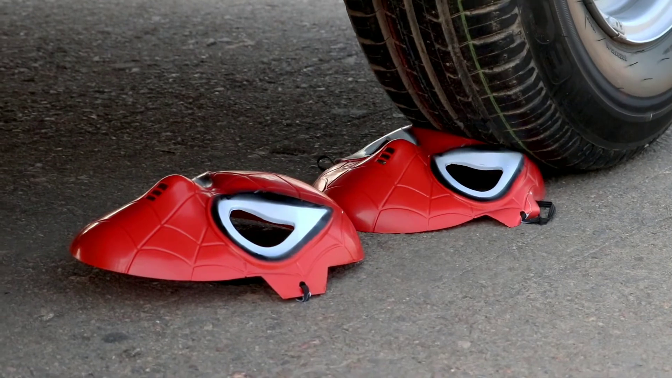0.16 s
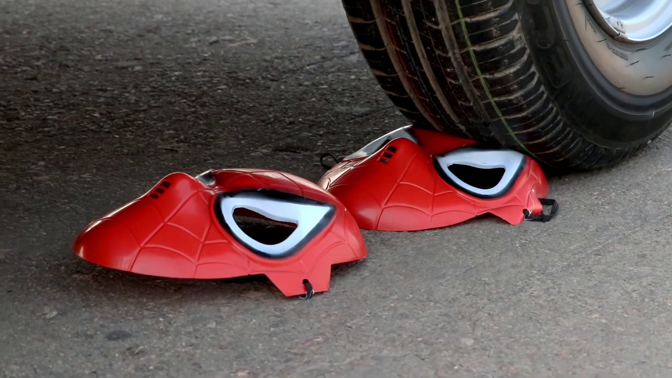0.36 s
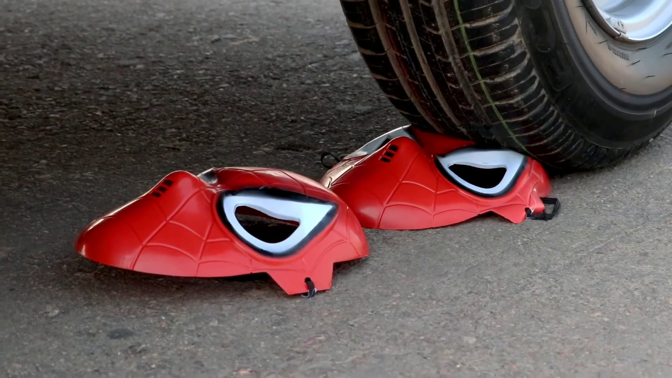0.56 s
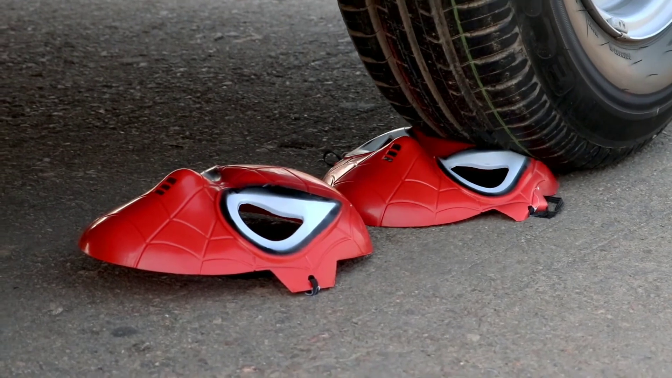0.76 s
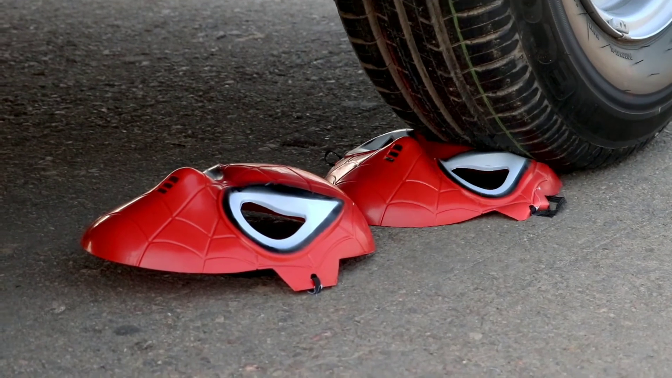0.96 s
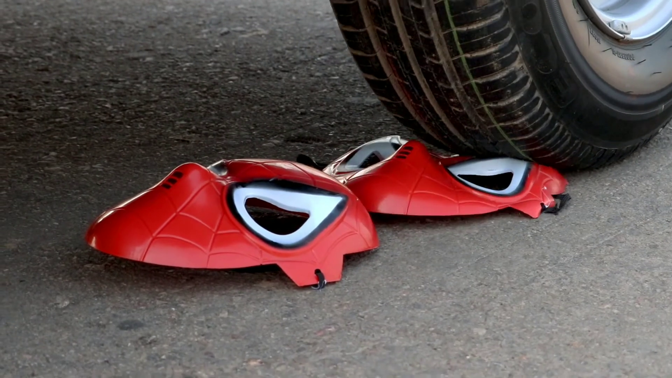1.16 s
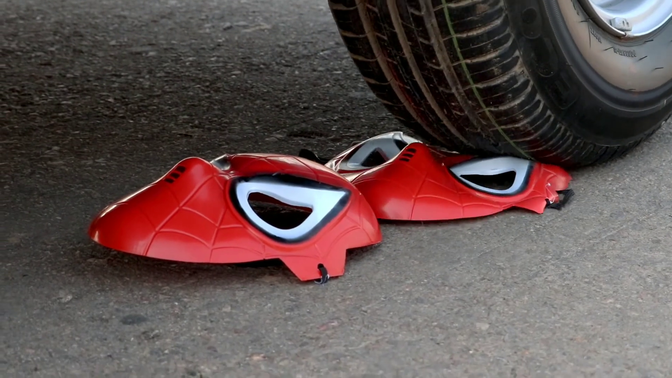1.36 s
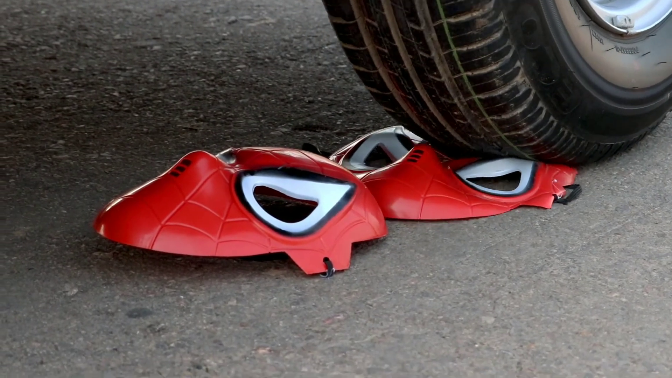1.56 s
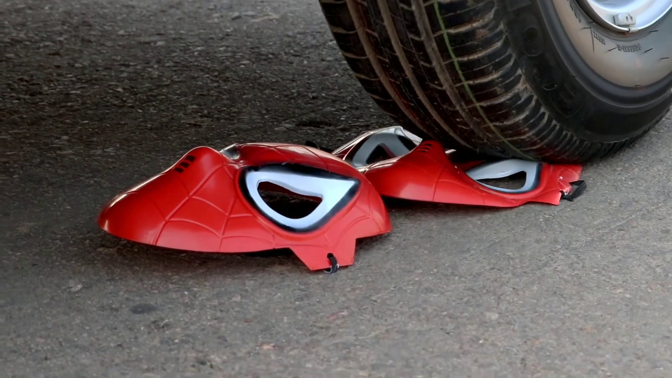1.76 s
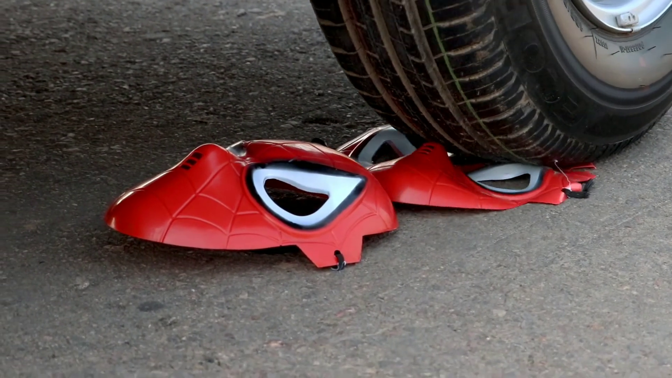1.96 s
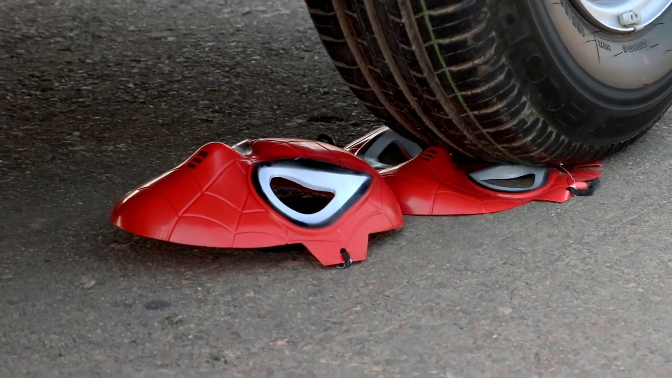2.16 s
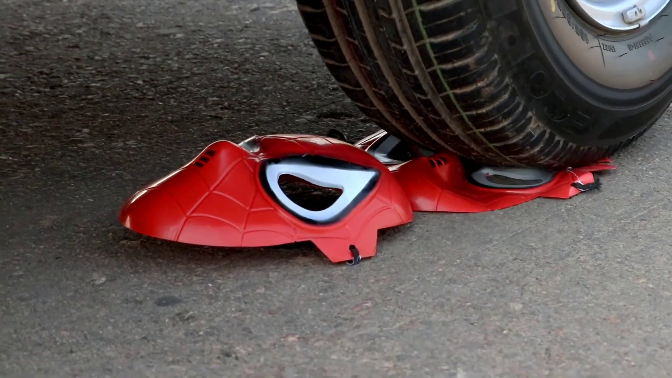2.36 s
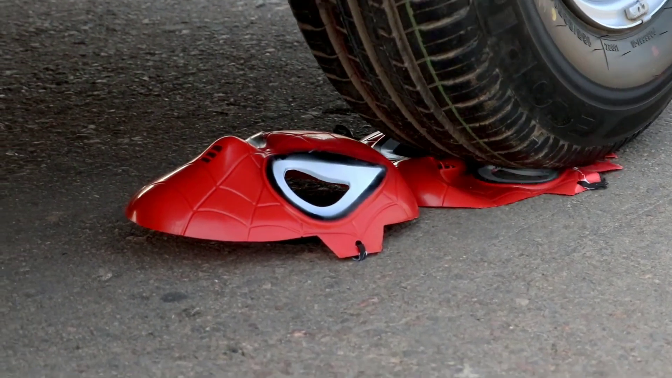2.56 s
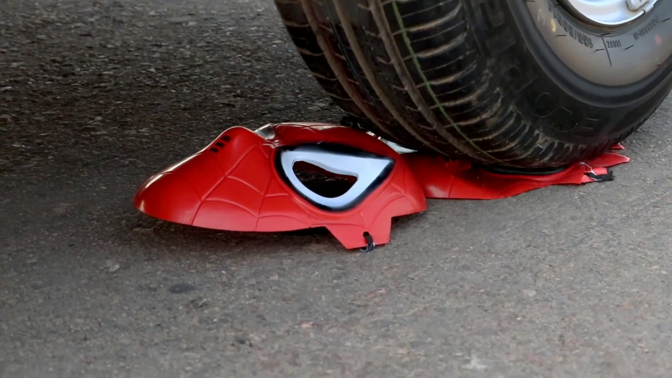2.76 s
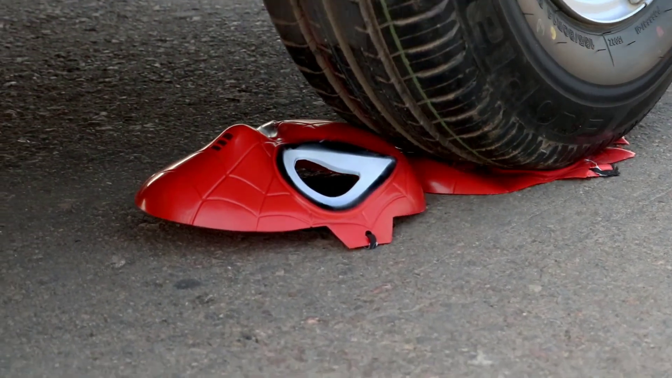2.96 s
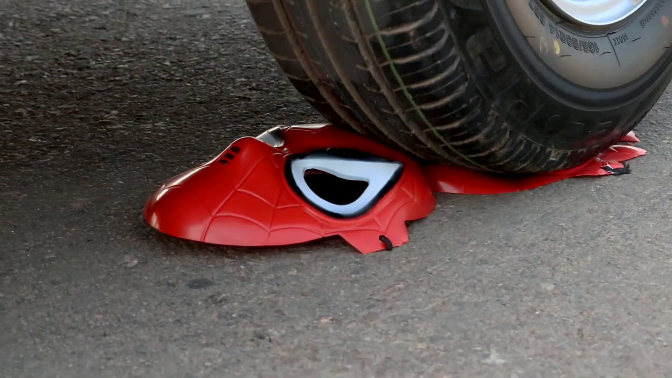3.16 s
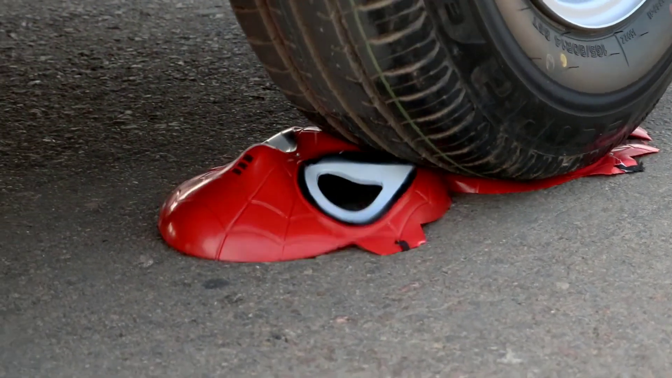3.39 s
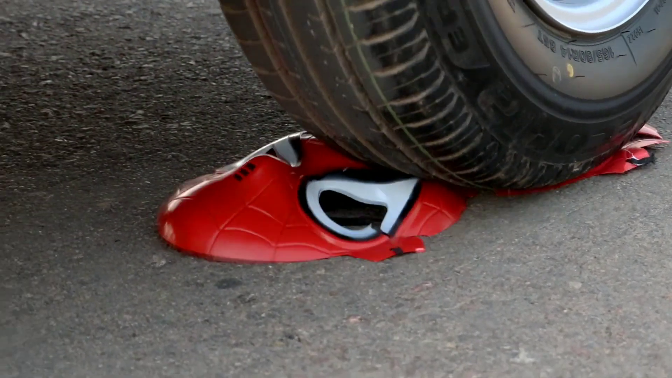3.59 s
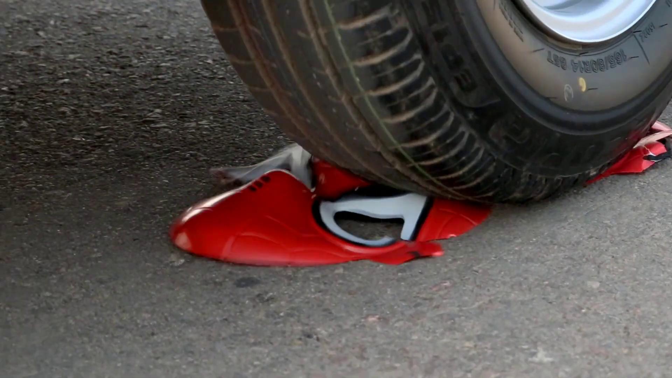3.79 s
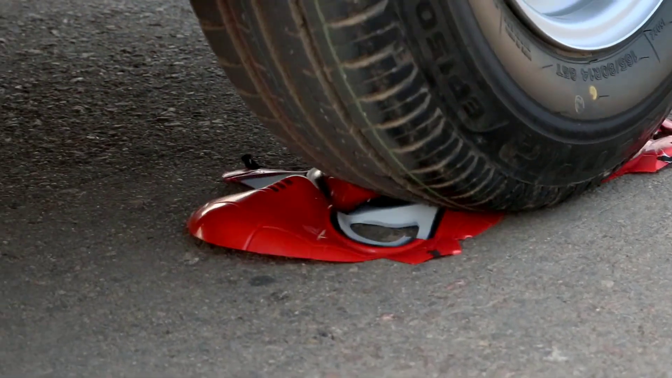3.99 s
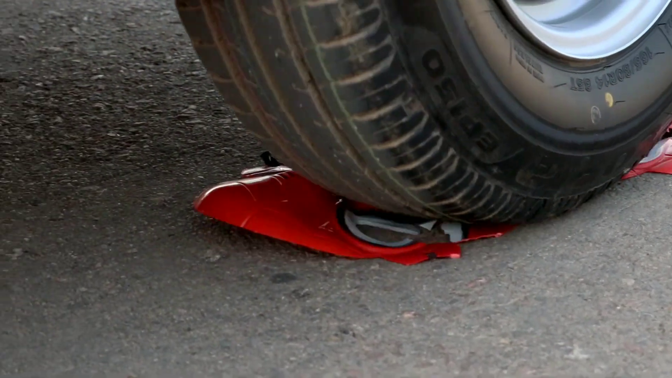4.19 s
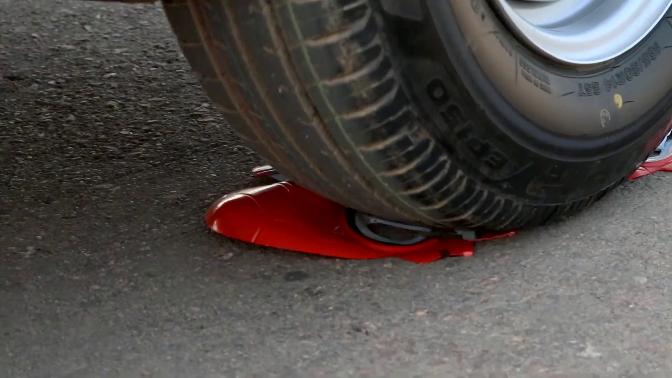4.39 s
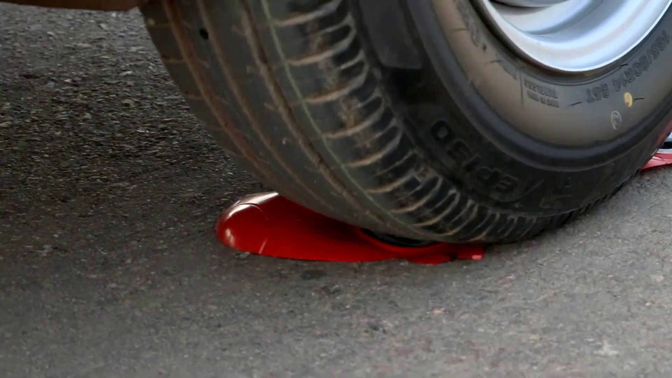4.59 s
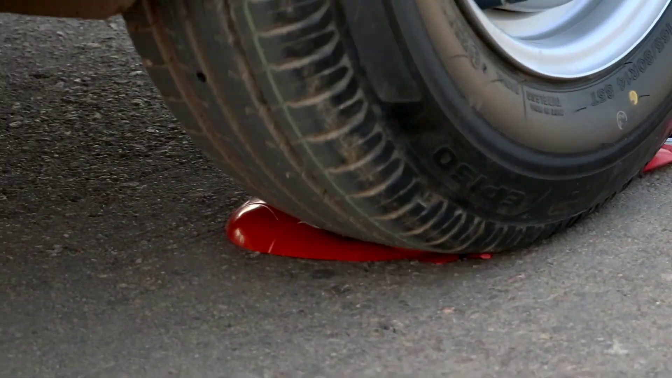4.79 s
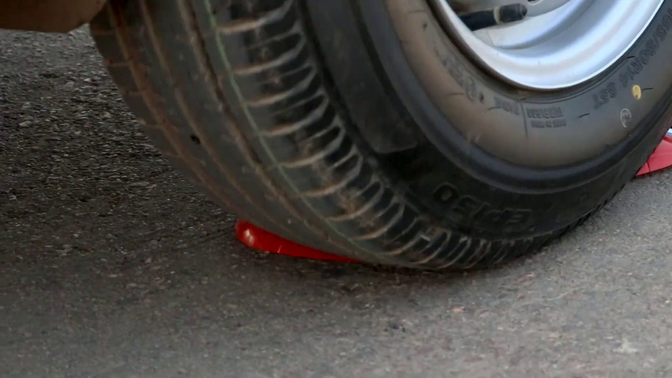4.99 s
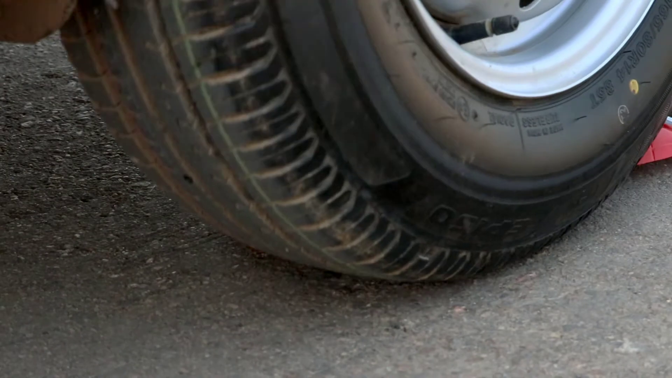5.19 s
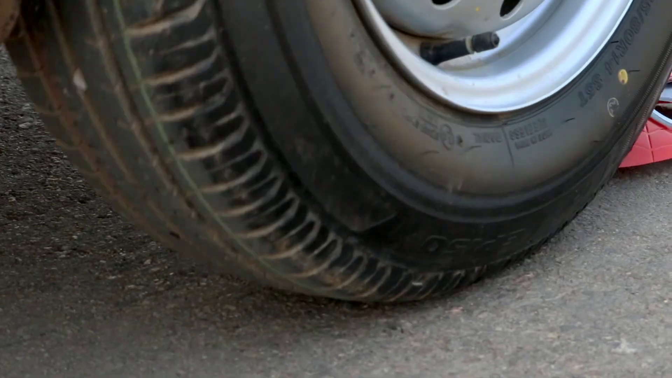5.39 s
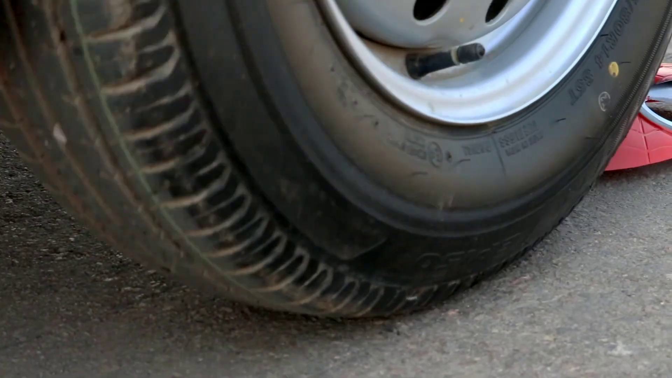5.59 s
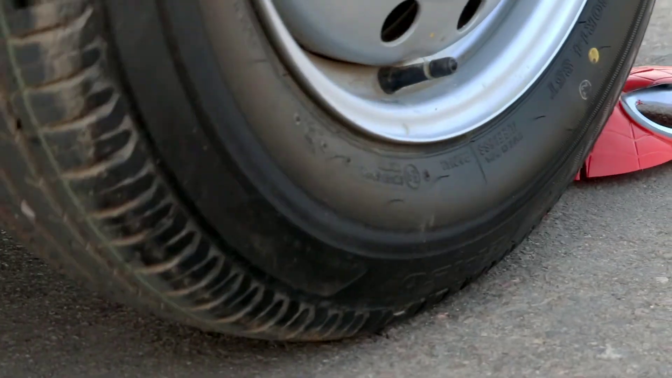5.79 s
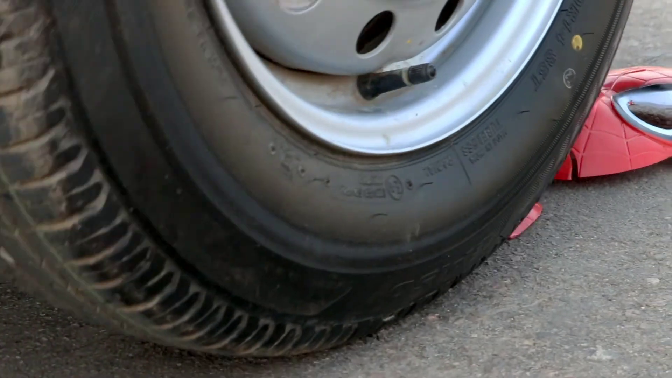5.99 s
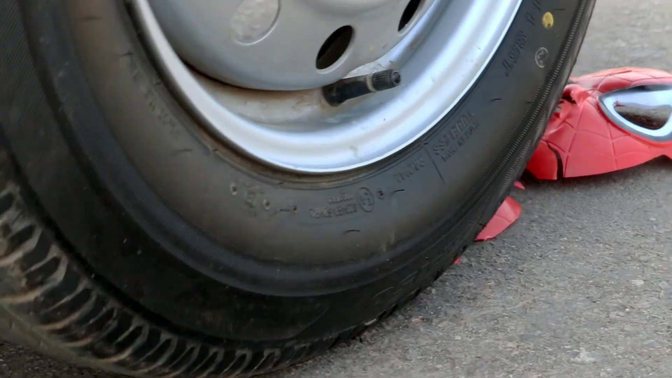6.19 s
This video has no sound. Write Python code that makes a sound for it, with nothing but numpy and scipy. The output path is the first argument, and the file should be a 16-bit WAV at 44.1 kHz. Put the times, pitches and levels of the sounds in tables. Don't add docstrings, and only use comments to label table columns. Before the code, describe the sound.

Slow-motion crushing of plastic masks on asphalt: heavy muffled cracks in uneven bursts, the loudest distorting, each trailing a short outdoor echo.

```python
import sys
import numpy as np
from scipy import signal
from scipy.fft import rfft, irfft, next_fast_len
from scipy.io import wavfile
from scipy.ndimage import uniform_filter1d

SR = 44100
rng = np.random.default_rng(int(sys.argv[2]) if len(sys.argv) > 2 else 0)


def undo_db(level):
    steps = np.asarray(level, float) / 20
    return 10 ** steps


def waveform_to_disk(signal):
    frames = np.transpose(np.atleast_2d(signal))
    scaled = np.clip(frames, -1, 1) * 32767
    samples = np.round(scaled).astype(np.int16)
    wavfile.write(sys.argv[1], SR, samples)


N = 275536
PATCH_HZ = np.linspace(70, 4700, 70)
LAG_S = 0.002


def evened(x):
    return x / np.sqrt(np.mean(x ** 2) + 1e-20)


def read(points, hz):
    f, value = np.transpose(points)
    return np.interp(np.log(hz + 1), np.log(f + 1), value)


def add(mix, s, sound):
    part = mix[round(s * SR):][:len(sound)]
    part += sound[:len(part)]


def shaped(length, frame, db):
    hz = np.fft.rfftfreq(frame, 1 / SR)
    t = np.arange(4 * length // frame + 5) * frame / 4 / SR
    a, b = rng.standard_normal((len(t), len(hz), 2)).T
    spectra = (a + 1j * b) * undo_db(db(hz[:, None], t))
    return signal.istft(spectra, nperseg=frame, noverlap=3 * frame // 4)[1][:length]


def modes(hz, db, t60, phase, rise_s):
    t = np.arange(SR // 15)[:, None] / SR
    swell = (1 - np.exp(-t / rise_s)) ** 2
    decay = undo_db(db - 60 * t / t60)
    x = (decay * swell * np.sin(2 * np.pi * (hz * t + phase))).sum(1)
    return x / abs(x).max()


def linger(x, t60):
    keep = 10 ** (-6 / (t60 * SR))
    energy = uniform_filter1d(x ** 2, size=400)
    return np.sqrt(abs(signal.lfilter([1 - keep], [1, -keep], energy)))


def wind(breaks):
    # f/Hz, level per Hz/dB
    rumble = [(8.8, -25), (15, 5.5), (50, -7.5), (67, -22.5), (81, -26.5), (130, -23.5), (170, -54),
              (290, -120)]
    # t/s, level/dB
    gusts = [(0, -40.5), (.25, -47), (.68, -49), (.87, -47), (1.2, -52), (1.4, -40.5), (1.9, -50),
             (2.3, -45.5), (2.7, -51.5), (3.1, -48.5), (3.55, -36.5), (3.7, -46), (4.5, -46), (5.1, -51),
             (5.45, -52), (5.6, -44.5), (6.1, -51), (6.25, -58)]
    t = np.arange(N) / SR
    noise = evened(shaped(N, 4096, lambda hz, t: read(rumble, hz) + 0 * t))
    shake = undo_db(-26) * linger(breaks, t60=0.3)
    return noise * np.hypot(undo_db(np.interp(t, *np.transpose(gusts))), shake)


def street_hush(breaks):
    # f/Hz, level per Hz/dB
    spectrum = [(53, -28.5), (90, -5.5), (227, -4), (327, -3), (374, -1.5), (463, -19.5), (565, -9),
                (1860, -17), (3670, -37), (4700, -67.5), (6110, -81.5), (10300, -120)]
    # t/s, level/dB
    street = [(0.0, -54.5), (.5, -53.5), (3.0, -52), (4.5, -52.5), (6.25, -58.5)]

    def level(hz, t):
        patches = rng.standard_normal((len(t), len(hz))).T
        patches = uniform_filter1d(patches, size=8, axis=0)
        patches = uniform_filter1d(patches, size=10, axis=1)
        return read(spectrum, hz) + 0.74 * evened(patches)

    t = np.arange(N) / SR
    noise = evened(shaped(N, 1024, level))
    late = undo_db(-30) * linger(breaks, t60=1)
    return noise * np.hypot(undo_db(np.interp(t, *np.transpose(street)) - 2.5), late)


def colour(shell_hz, middle_db, crack_db, top_db):
    # f/Hz, level/dB
    crack = [(1600, -0.5), (2050, 3.5), (2500, -1), (3150, -10.5), (3700, -19), (4700, -25.5)]
    points = [(40, -22), (0.5 * shell_hz, -9), (shell_hz, 0), (0.51 * shell_hz + 120, -3),
              (1150, middle_db + 4.0)]
    for hz, db in crack:
        tilt_db = top_db * max(np.log2(hz / 2400), 0)
        points.append((hz, db + crack_db - 0.5 + tilt_db))
    return points


def yard(tint):
    # f/Hz, t60/s
    decay = [(100, 0.43), (260, 0.34), (700, 0.35), (1840, 0.32), (3200, 0.22), (4600, 0.29)]
    # f/Hz, level/dB
    reflections = [(60, 4), (300, 1.1), (1000, 3), (2500, 2), (4600, 0.5)]

    def level(hz, t):
        return read(tint, hz) + read(reflections, hz) - 60 * t / read(decay, hz)

    tail = shaped(SR * 2 // 5, 512, level)
    t = np.arange(len(tail)) / SR
    lumps_db = 1.5 * np.interp(t, np.arange(80) / 200, rng.standard_normal(80))
    tail *= (1 - np.exp(-(t / 0.0065) ** 2)) * undo_db(lumps_db)
    return tail / np.linalg.norm(tail)


def snap(row, luck):
    # t/s, covered share/1
    tyre_cover = [(0, 0), (1.5, 0.59), (2.5, 0), (3.3, .1), (4.4, .05), (4.76, 0.83), (5.0, .7), (5.3, 1)]
    s, peak_db, shell_hz, crack_db, t60 = row
    place, phase = luck
    cover = np.interp(s, *np.transpose(tyre_cover))
    echo_db = 1.32 + 4.5 * cover
    top_db = 1 - 18.5 * cover ** 8
    middle_db = -3 + 0.63 * crack_db
    tint = colour(shell_hz, middle_db, crack_db, top_db)
    t60 = max(t60, 0.012)
    shell = modes(shell_hz * np.array([1, 1.3]), np.array([0, -8]), t60, phase[:2], rise_s=0.001)
    hz = PATCH_HZ + 66 * place
    patches = modes(hz, read(tint, hz), t60 * (hz / 400) ** -0.3, phase, rise_s=0.00009 + 1.195 / hz)
    direct = undo_db(-7.5) * shell + undo_db(-4.0) * patches
    tail = undo_db(peak_db + echo_db) * np.linalg.norm(direct) * yard(tint)
    return s + LAG_S, undo_db(peak_db) * direct, tail


def shells():
    # t/s, peak level/dB, shell pitch f/Hz, crack level over the shell/dB
    dents = [(0.242, -38, 370, -34), (1.734, -28, 372, -35), (2.351, -19.5, 270, -38.5),
             (3.165, -22.5, 291, -68), (3.253, -31.5, 362, -43), (3.203, -32, 247, -49),
             (3.662, -17, 605, -38), (3.703, -15, 239, -36), (4.562, -44.5, 443, 0),
             (4.687, -44.5, 222, -41.5), (5.153, -30, 498, -18.5)]
    # t/s, peak level/dB, shell pitch f/Hz, crack level over the shell/dB, ring t60/s
    collapses = [(0.545, -5, 354, -19.5, 0.036), (0.655, -4, 505, -9, 0.038), (0.84, -3, 339, -17, 0.051),
                 (1.137, -5.5, 666, -24, 0.07), (1.259, 2, 368, -16.5, 0.027),
                 (1.782, -8, 342.7, -15, 0.028), (1.946, 0, 599.5, -14, 0.04), (2.025, 8, 522, -15, 0.026),
                 (2.456, 3, 432, -16, 0.036), (2.885, -11, 274, -8, 0.041), (3.097, -15.5, 770, -5, 0.0096),
                 (3.282, -15.5, 293, -13, 0.033), (3.735, 5, 296, -21.5, 0.025),
                 (3.819, 2, 363.5, -9, 0.067), (4.072, 6.5, 557, -19, 0.028), (4.278, 5.5, 518, -13, 0.03),
                 (4.789, -6.5, 541, -35, 0.027), (4.847, -3, 477, -19, 0.04),
                 (5.328, -15.5, 339, -22, 0.027), (5.915, -18, 414, -26, 0.054),
                 (3.395, -20.5, 266, -43.5, 0.13)]
    splits = [(0.646, -16, 600, -7.5, 0.045), (0.662, -0.5, 395, -20, 0.016), (0.846, -4, 273, -24.5, 0.03),
              (1.25, -6.5, 276.3, -11.5, 0.2), (1.264, 2, 257, -14, 0.036), (1.277, -7.5, 436, -27, 0.0097),
              (2.451, -7.5, 618, -12.5, 0.042), (3.833, -5, 465, -15.5, 0.041),
              (3.837, 5, 335.8, -22.5, 0.045), (4.083, 1, 267.6, -14.5, 0.03),
              (4.091, 3, 562.7, -23, 0.029), (4.097, 4, 280, -35, 0.05), (4.285, -8.5, 568, -6, 0.031),
              (4.782, -10, 600, -17.5, 0.09), (4.85, 1, 614, -12, 0.034), (5.921, -30, 259, -26, 0.19)]
    # delay t/s, level/dB
    reflections = [
        (.011, -13),
        (.019, -15),
    ]
    near, far = np.zeros((2, N))
    dent_t60_s = 0.091
    rows = [*collapses, *splits] + [(*row, dent_t60_s) for row in dents]
    for row, luck in zip(rows, rng.random((len(rows), 2, len(PATCH_HZ)))):
        s, direct, tail = snap(row, luck)
        add(near, s, direct)
        add(far, s, tail)
    softened = uniform_filter1d(near, size=9)
    echoes = np.zeros(N)
    for k, (delay_s, db) in enumerate(reflections):
        echoes += undo_db(db) * (-1) ** k * np.roll(softened, round(delay_s * SR))
    return near + echoes + undo_db(-10.5) * far


def thuds():
    # t/s, peak level/dB, f/Hz
    knocks = [(0.651, -10.5, 240), (0.838, -15, 178), (1.135, -11, 179), (1.257, -11.5, 244.3),
              (2.026, -12.5, 170), (2.352, -61, 239.4), (2.455, -15.5, 174.6), (2.886, -20.5, 189),
              (3.093, -32, 180), (3.28, -21, 140), (3.396, -25.5, 136), (3.663, -23, 187),
              (3.73, -12.5, 222), (3.833, -16.5, 181.2), (4.069, -12, 162.2), (4.088, -15.5, 97),
              (4.28, -11.5, 245.3), (4.783, -16, 247.3), (4.846, -12.5, 222), (5.327, -59, 190),
              (5.911, -36, 235)]
    out = np.zeros(N)
    for (s, peak_db, hz), phase in zip(knocks, rng.random((len(knocks), 2))):
        knock = modes(hz * np.array([1, 0.7]), np.array([0, -6]), 0.075, phase, rise_s=0.0007)
        add(out, s + LAG_S, undo_db(peak_db) * knock)
    return out


def wobble():
    # start t/s, length/s, level/dB, f/Hz
    rockings = [
        (3.18, 0.043, -37, 239.4),
        (3.236, 0.07, -36.5, 235),
        (3.299, 0.22, -35, 223),
        (3.413, 0.089, -37.5, 244.6),
        (5.344, 0.034, -32.5, 209),
    ]
    fall_db_per_s, sag_per_s = 216, 2
    out = np.zeros(N)
    keep = np.exp(-np.pi * 70 / SR)
    for s, length, db, hz in rockings:
        t = np.arange(-0.01, length + 0.015, 1 / SR)
        noise = rng.standard_normal((SR // 4, 2))[:len(t)] @ [1, 1j]
        slow = signal.lfilter([1], [1, -2 * keep, keep ** 2], noise)
        steadied = slow / (abs(slow) + 0.6 * abs(slow).mean())
        turns = np.cumsum(hz * (1 - sag_per_s * t)) / SR
        ring = (steadied * np.exp(2j * np.pi * turns)).real
        fade = undo_db(db - fall_db_per_s * t) * signal.windows.tukey(len(t), 0.25)
        add(out, s + t[0], evened(ring) * fade)
    return out


def scene():
    breaks = shells()
    air = wind(breaks) + street_hush(breaks)
    return (air + breaks + thuds() + wobble())[None]


def top_cut(x):
    return signal.sosfilt(signal.butter(12, 16300, fs=SR, output="sos"), x)


def record(dry):
    # f/Hz, level/dB
    mirror = [(7200, -15), (7800, -22), (8300, -31), (8800, -48), (9300, -60), (10300, -66), (11800, -80)]
    slow_rate_hz, edge_hz = 12000, 4800
    edge = signal.firwin(1001, edge_hz, window=("kaiser", 8), fs=SR)
    band = signal.oaconvolve(np.clip(dry, -1.02, 1.02), edge[None], "same")
    mirrored = 2 * band * np.cos(2 * np.pi * slow_rate_hz * np.arange(N) / SR)
    size = next_fast_len(N, True)
    hz = np.fft.rfftfreq(size, 1 / SR)
    image = rfft(mirrored, size) * undo_db(read(mirror, hz)) * (hz > edge_hz)
    slowed = band + irfft(image, size)[:, :N]
    slowed += undo_db(-101) * rng.standard_normal(N)
    return top_cut(np.clip(slowed, -1, 1))


dry = scene()
out = record(dry)
waveform_to_disk(out)
```